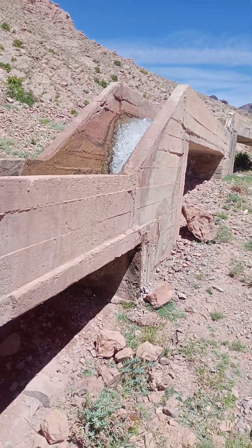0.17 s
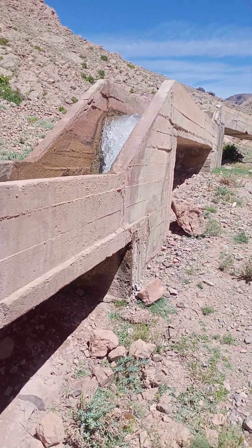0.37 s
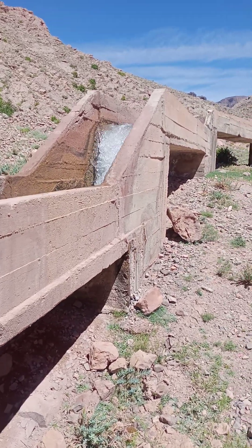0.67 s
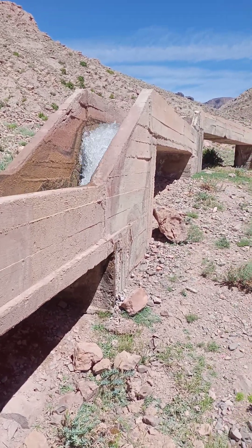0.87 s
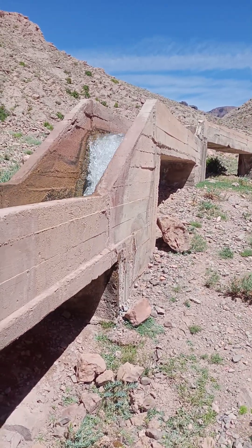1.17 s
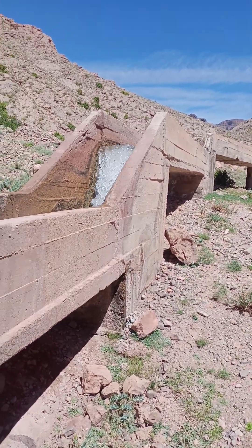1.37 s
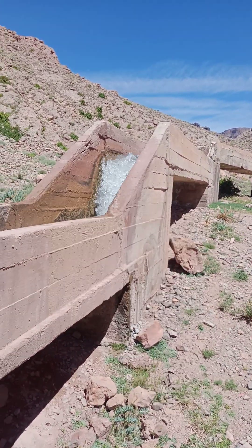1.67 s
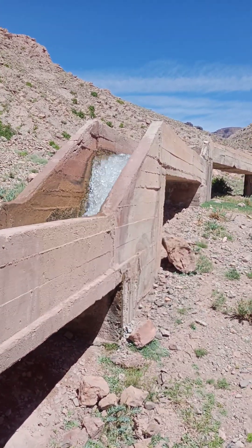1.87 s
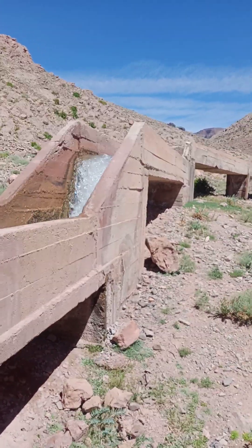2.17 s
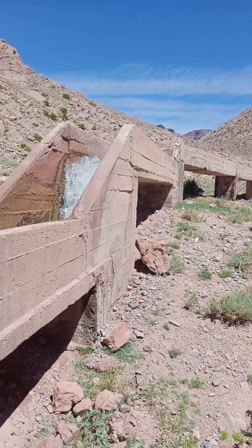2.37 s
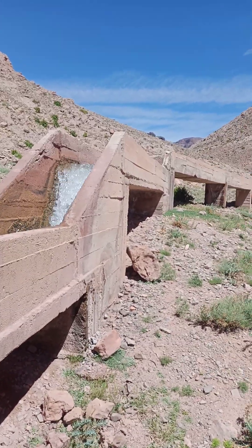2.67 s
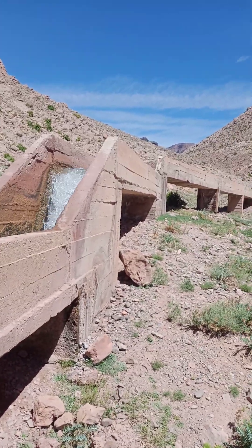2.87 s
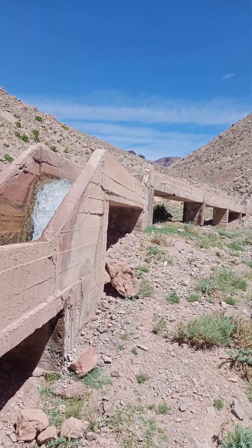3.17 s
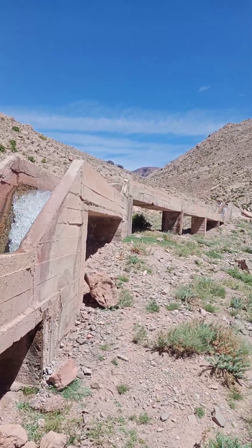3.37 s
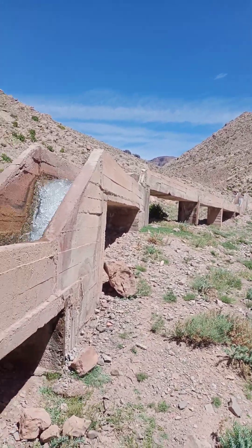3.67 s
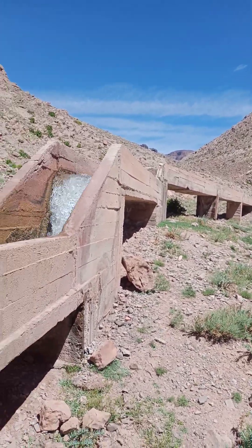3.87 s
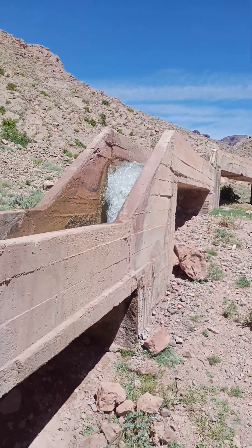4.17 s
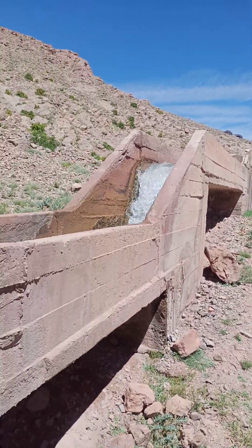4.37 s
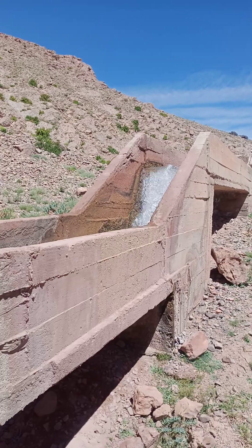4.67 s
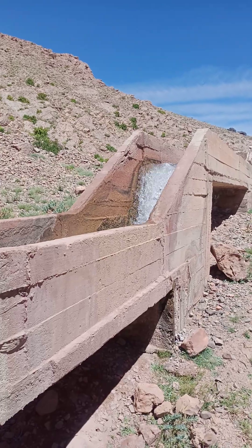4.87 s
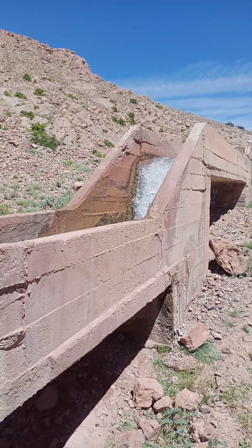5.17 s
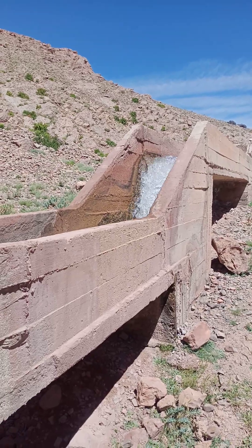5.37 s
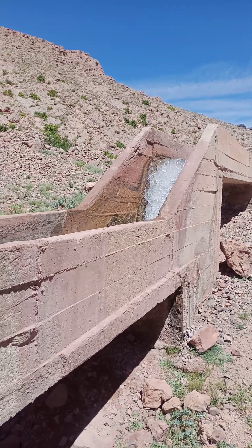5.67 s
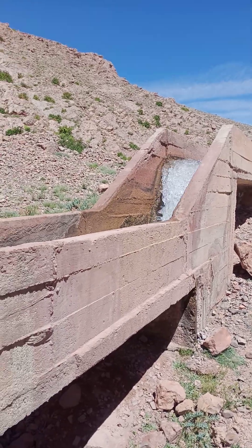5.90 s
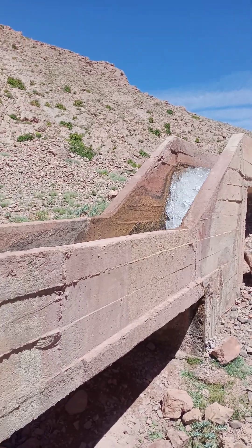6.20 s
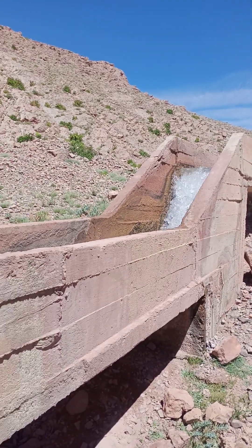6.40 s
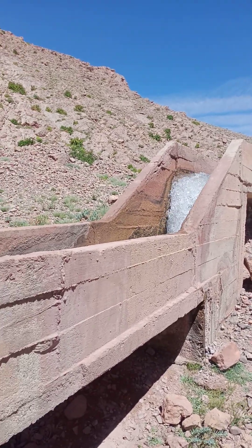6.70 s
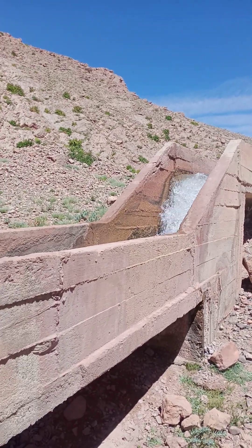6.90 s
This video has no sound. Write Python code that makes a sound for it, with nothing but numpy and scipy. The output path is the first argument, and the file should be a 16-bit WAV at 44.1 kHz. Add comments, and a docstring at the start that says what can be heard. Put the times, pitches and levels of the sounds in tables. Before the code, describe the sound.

Bright, dense hiss of pouring water in a channel, overlaid by muffled wind thumps that swell into one strong rumbling gust late on.

```python
"""An open hillside: water pours down a concrete chute a few metres from a hand-held microphone that turns slowly.
The water is dense droplet noise; it arrives direct and off a hard surface nearby, which combs it, and its colour
changes with the turn. Splashes lift it briefly, and a hollow in the hiss slides mostly upward near the end.
Wind tumbles over the microphone port: lumpy low noise, with separate thumps made as short pulses of pressure.
The recorder turns its gain down under sustained loud wind and lets it creep back."""
import sys
import numpy as np
from scipy import signal
from scipy.fft import rfft, irfft
from scipy.io import wavfile

SR = 44100
rng = np.random.default_rng(int(sys.argv[2]) if len(sys.argv) > 2 else 0)


def wav_out(sig):
    """Save sig, one row per channel (or a flat mono array), as 16-bit PCM at SR to the path in sys.argv[1]."""
    wavfile.write(sys.argv[1], SR, np.round(np.clip(np.atleast_2d(sig).T, -1, 1) * 32767).astype(np.int16))


N = 310464   # length in samples

# Single eddies hitting the microphone port, levels as they stand ahead of the recorder.
# Each row: peak time in seconds, peak in dB, pitch in Hz, rough edge in dB relative to the peak.
EDDIES = [(0.257, -16, 173, -15), (0.266, -5, 294, -41), (0.354, -13, 138, -18), (0.792, -14.5, 157, -32),
          (0.832, -15, 114, -27), (1.109, -9.5, 196, -26), (1.19, -13, 167, -28), (1.257, -11, 185, -13),
          (1.333, -8.5, 168, -27), (1.361, -9.5, 207, -24), (1.469, -10, 165, -36), (1.529, -9, 124, -43),
          (2.265, -18, 260, -4), (2.277, -5.5, 330, -13.5), (2.323, -12.5, 123, -14),
          (2.34, -19.5, 298, -4), (2.459, -14.5, 134, -17), (2.481, -17, 302, -15),
          (2.559, -14.5, 171, -6.5), (2.692, -10.5, 192, -12.5), (2.855, -8.5, 174, -40),
          (2.887, -10.5, 185, -34), (2.906, -10, 148, -25), (3.493, -5, 160, -32), (3.721, -14.5, 161, -33),
          (4.007, -14, 170, -28), (4.078, -6, 226, -31), (4.507, -11.5, 257, -15), (4.574, -12, 130, -10.5),
          (4.728, -5.5, 176, -19.5), (4.74, -4.5, 194, -35), (4.779, -6.5, 224, -28),
          (4.832, 1.5, 320, -18), (4.851, -3, 150, -24), (4.955, 1, 212, -10.5), (5.011, -2, 190, -12.5),
          (5.031, -12.5, 250, -3.5), (5.07, -3.5, 179, -14), (5.055, -5, 229, -11.5),
          (5.101, -6.5, 240, -9), (5.122, -0.5, 224, -11), (5.201, -5.5, 181, -14), (5.219, -4.5, 180, -13),
          (5.245, -13, 200, -7), (5.32, -12.5, 162, -6), (5.365, -5.5, 215, -18.5), (5.409, -10, 223, -19),
          (5.45, -3.5, 201, -55), (5.477, -7.5, 282, -13.5), (5.509, -10.5, 285, -18),
          (6.074, -15, 164, -23), (6.286, -13, 148, -18), (6.72, -20, 174, -33), (6.821, -7.5, 229, -20),
          (6.858, -6.5, 200, -17), (6.865, -5, 208, -13.5), (6.882, -13, 190, -17), (6.897, -5, 166, -27)]


def from_db(db):
    """Decibels to gain."""
    return 10 ** (np.asarray(db) / 20)


def rms_one(x):
    """Scale to rms 1."""
    return x / np.sqrt(np.mean(x ** 2) + 1e-20)


def rms_one_above(x, hz):
    """Scale so that the part above hz has rms 1."""
    high = signal.sosfilt(signal.butter(4, hz, "high", fs=SR, output="sos"), x)
    return x / np.sqrt(np.mean(high ** 2))


def in_time(rows):
    """Each column of a table, after the seconds, as a curve over all samples."""
    s, *columns = np.transpose(rows)
    return [np.interp(np.arange(N) / SR, s, c) for c in columns]


def at_hz(points, hz):
    """Read a spectrum in dB on a log-frequency axis."""
    points_hz, points_db = np.array(points).T
    return np.interp(np.log(hz + 1), np.log(points_hz), points_db)


def drift(rate_hz):
    """Slow chance: noise through a double one-pole low-pass, spread 1."""
    r = np.exp(-2 * np.pi * rate_hz / SR)
    slow = signal.lfilter([1], [1, -2 * r, r * r], rng.standard_normal(N + SR))
    return rms_one(slow[SR:])   # the first second lets the filter settle


def coloured(x, spectrum):
    """Give x a fixed colour by weighting its whole spectrum."""
    hz = np.fft.rfftfreq(len(x), 1 / SR)
    return irfft(rfft(x) * from_db(at_hz(spectrum, hz)), len(x))


def wake():
    """Power of the rumble that builds up to each eddy and dies away after it."""
    level_db, rise_s, fall_s = -15, 0.01, 0.013   # level is relative to the eddy's peak
    t = np.arange(N // 32 + 1) * 32 / SR   # every 32nd sample is fine enough
    power = np.zeros(len(t))
    for s, peak_db, *_ in EDDIES:
        power += from_db(peak_db + level_db) ** 2 * np.exp(-np.abs(t - s) / np.where(t < s, rise_s, fall_s))
    return np.interp(np.arange(N) / SR, t, power)


def wind():
    """Turbulence at the port: lumpy rumble, and a brighter flutter that grows faster than it as a gust swells."""
    # Wind between eddies. Each row: time in seconds, rumble level in dB before wake and drift.
    gusts = [(0, -30), (.35, -28), (1.0, -31.5), (1.35, -29), (1.75, -30.5), (2.7, -27), (3.2, -33.5),
             (3.7, -26), (3.9, -30), (4.45, -28), (4.7, -24), (5.35, -20), (5.85, -30), (6.25, -29),
             (6.6, -31.5), (7.04, -26)]
    # Colours of the two noises. Each row: frequency in Hz, relative density in dB per Hz.
    rumble_colour = [(12, -42), (20, -23), (70, 0.5), (141, 1), (185, 0), (238, -5.5), (269, -4.5),
                     (500, -21.5), (650, -99), (1100, -120)]
    flutter_colour = [(180, -77), (300, 6.5), (667, -6), (1910, -42), (2230, -60), (2550, -60), (3000, -51),
                      (3900, -59), (6600, -120)]
    gust_power = from_db(in_time(gusts)[0]) ** 2
    rumble_db = 10 * np.log10(gust_power + wake()) + 2.68 * drift(21)
    flutter_db = -36.5 + 1.34 * (rumble_db + 22) + 4 * drift(33)
    rumble = rms_one(coloured(rng.standard_normal(N), rumble_colour))
    flutter = rms_one(coloured(rng.standard_normal(N), flutter_colour))
    return from_db(rumble_db) * rumble + from_db(flutter_db) * flutter


def thumps():
    """Each eddy is a brief pressure swing under a bell envelope, with a puff of rough air and a bright front."""
    # Rough air of an eddy. Each row: frequency in Hz, relative density in dB per Hz.
    edge_colour = [(150, -44), (400, 7.5), (800, -5.5), (1500, -21.5), (3000, -39), (5000, -76)]
    bell_rise_cycles, bell_fall_cycles = 0.21, 0.47   # Gaussian widths before and after the peak
    puff_rise_s, puff_fall_s = 0.0016, 0.0083   # rough air arrives fast and trails off
    front_db, front_growth, front_s = -26.5, 1.7, 0.0026   # base level, dB per dB of rough air, Gaussian width
    out = np.zeros(N)
    phases = rng.uniform(0, 2 * np.pi, len(EDDIES))
    rough = rms_one(coloured(rng.standard_normal(N), edge_colour))
    bright_band = signal.butter(4, [900, 3000], "band", fs=SR, output="sos")
    bright = rms_one(signal.sosfilt(bright_band, rng.standard_normal(N)))
    for (s, peak_db, pitch_hz, edge_db), phase in zip(EDDIES, phases):
        at = int(s * SR) + np.arange(-SR // 20, SR // 20)
        t = at / SR - s
        bell_cycles = np.where(t < 0, bell_rise_cycles, bell_fall_cycles)
        bell = np.exp(-0.5 * (t * pitch_hz / bell_cycles) ** 2)
        pulse = bell * np.cos(2 * np.pi * pitch_hz * t + phase)
        puff = np.exp(-np.abs(t + 0.0015) / np.where(t < -0.002, puff_rise_s, puff_fall_s))
        out[at] += from_db(peak_db) * (pulse + from_db(edge_db) * puff * rough[at])
        front_gain = from_db(front_db + front_growth * (peak_db + edge_db + 8))
        out[at] += front_gain * np.exp(-0.5 * (t / front_s) ** 2) * bright[at]
    return out


def spray(per_s, spread_db):
    """Dense droplet impacts of uneven size and either sign, scaled to rms 1."""
    sizes = from_db(spread_db * np.minimum(rng.exponential(1, N), 5)) * rng.standard_normal(N)
    return rms_one(sizes * (rng.random(N) < per_s / SR))


def turning_colour(turn, hz, when):
    """Gain per frequency and frame: colour at the microphone's angle, fixed resonances, and the sliding hollow."""
    # Colour of the water. Each row: frequency in Hz, relative density in dB per Hz at turn 0, at turn 1, at turn 2.
    water_colours = np.array([(505, 1.5, 3, -5), (1160, -5, -5.5, -8.5), (2050, -3, -3, -4),
                              (3120, -4.5, -11, -20), (3960, -10.5, -10.5, -10.5), (4130, -10, -17.5, -26),
                              (4800, -27.5, -23, -9.5), (5830, -19.5, -13.5, -10.5),
                              (6600, -15.5, -17.5, -20), (8300, -16, -8.5, 1.5), (10260, -12.5, -15, -39),
                              (11100, -16.5, -25.5, -8), (12300, -23, -25.5, -18), (13700, -28, -23, -20),
                              (16100, -25, -20, -10)])
    # Fixed resonances on the way to the capsule. Each row: centre in Hz, half-width in Hz, lift in dB.
    capsule_humps = [(750, 150, 3), (2320, 180, 4), (3950, 200, 4)]
    # Hollow in the hiss. Each row: time in seconds, centre in Hz, half-width in Hz, depth in dB (negative lifts).
    hollow_path = [(0, 3500, 400, 2), (5.9, 3300, 350, -0.5), (6.0, 3750, 350, 6), (6.09, 5030, 450, 7),
                   (6.6, 6030, 800, 7), (7.04, 5900, 800, 6)]
    colours = np.array([at_hz(water_colours[:, [0, column]], hz) for column in (1, 2, 3)])
    now = np.clip(turn[when], 0, 2)
    weights = np.maximum(0, 1 - np.abs(now - np.arange(3)[:, None]))   # neighbouring colours cross-fade
    humps_db = sum(db * np.exp(-((hz - top_hz) / width) ** 2) for top_hz, width, db in capsule_humps)
    centre, width, depth_db = (c[when] for c in in_time(hollow_path))
    hollow = np.exp(-((hz[:, None] - centre) / width) ** 2)
    twin = np.exp(-((hz[:, None] - 3.1 * centre) / (2.5 * width)) ** 2)   # wider, about three times higher
    gain = from_db(colours.T @ weights + humps_db[:, None] - depth_db * (hollow + twin))
    return gain / np.sqrt(np.mean(gain[hz > 1800] ** 2, axis=0))   # equal gain power above 1800 Hz in each frame


def splash_lift_db(hz, s, when):
    """Falling water is uneven: spectral regions waver apart, and heavier slugs change a broad region briefly."""
    # Heavier slugs of water landing.
    # Each row: time in seconds, lift in dB (negative dips), centre of the region in Hz.
    slugs = [(.728, 4, 4000), (.955, -1, 2300), (1.395, 5.5, 2210), (2.154, 5.5, 2000), (3.374, 3, 3520),
             (5.84, 5, 8000), (5.955, 5, 2290), (6.296, 2.5, 2300), (6.375, 4.5, 2280)]
    log_hz = np.log(hz + 1)[:, None]
    centres = np.log(np.geomspace(700, 14000, 7))
    share = np.exp(-((log_hz - centres) / 0.25) ** 2)
    patches = np.array([drift(27)[when] for _ in centres])
    slugs_db = 0
    for at, db, centre_hz in slugs:
        region = ((log_hz - np.log(centre_hz)) / 1.3) ** 2
        moment = ((s - at) / 0.013) ** 2   # seconds
        slugs_db = slugs_db + db * np.exp(-region - moment)
    return 1.1 * share @ patches + slugs_db


def water():
    """Droplet noise, coloured frame by frame as the microphone turns, doubled by the reflection, then surging."""
    # Level of the rush above 2366 Hz. Each row: time in seconds, level in dB before the surges.
    rush_level = [(0, -44), (1.1, -43), (3.4, -40.5), (4.5, -43), (5.8, -44), (7.04, -44.5)]
    # Microphone. Each row: time in seconds, turn from 0 to 2, extra path of the reflection in ms.
    mic_turn = [(0, 0.1, 1.8), (.8, .75, 1.69), (2, 0.99, 1.72), (3.5, 1.38, 1.69), (4.5, 0.88, 1.57),
                (5.3, 0.71, 1.56), (5.9, .85, 1.48), (6.6, .4, 1.47), (7.04, .65, 1.5)]
    # Hard surface nearby. Each row: frequency in Hz, level in dB relative to the direct sound.
    reflection_colour = [(300, -16), (1450, -4.5), (2050, -8.5), (2650, -6.5), (3700, -12.5), (4400, -14),
                         (5600, -24), (7000, -50)]
    frame = 512   # samples
    turn, extra_ms = in_time(mic_turn)
    source = rng.standard_normal(N) + from_db(0.5) * spray(per_s=12000, spread_db=1.8)
    hz, s, frames = signal.stft(source, SR, nperseg=frame)
    when = np.minimum((s * SR).astype(int), N - 1)   # sample at the middle of each frame
    frames = frames * turning_colour(turn, hz, when) * from_db(splash_lift_db(hz, s, when))
    direct = signal.istft(frames, SR, nperseg=frame)[1][:N]
    reflected = coloured(direct, reflection_colour)
    late = np.interp(np.arange(N) - extra_ms * SR / 1000, np.arange(N), reflected)
    surge_db = 0.85 * drift(9.5) + 0.5 * drift(30)
    return from_db(in_time(rush_level)[0] + surge_db) * rms_one_above(direct + late, 2366)


def gain_control(x):
    """Sustained loud wind turns everything down; the gain creeps back afterwards."""
    listen_s, threshold_db = 0.13, -21
    squeeze, recovery_db_per_s = 0.68, 7   # squeeze: dB of cut per dB over the threshold
    r = np.exp(-1 / (listen_s * SR))
    level_db = 10 * np.log10(signal.lfilter([1 - r], [1, -r], x ** 2) + 1e-12)
    wanted_db = squeeze * np.maximum(level_db - threshold_db, 0)
    ramp = recovery_db_per_s * np.arange(N) / SR
    cut_db = np.maximum.accumulate(wanted_db + ramp, axis=-1) - ramp   # falls no faster than the recovery
    return x * from_db(-cut_db)


def scene():
    """Wind, thumps and water at one microphone."""
    return (wind() + thumps() + water())[None]


def record(dry):
    """The lowest bass is rolled off, the gain ducks, peaks are rounded, the top is cut."""
    bass_cut = signal.butter(3, 55, "high", fs=SR, output="sos")
    x = gain_control(signal.sosfilt(bass_cut, dry))
    rounded = 0.9 * np.tanh(x / 0.9)
    top_cut = signal.ellip(12, 0.5, 80, 15720, fs=SR, output="sos")   # ripple dB, stop-band dB, edge Hz
    return signal.sosfilt(top_cut, rounded)


dry = scene()
out = record(dry)
wav_out(out)
```